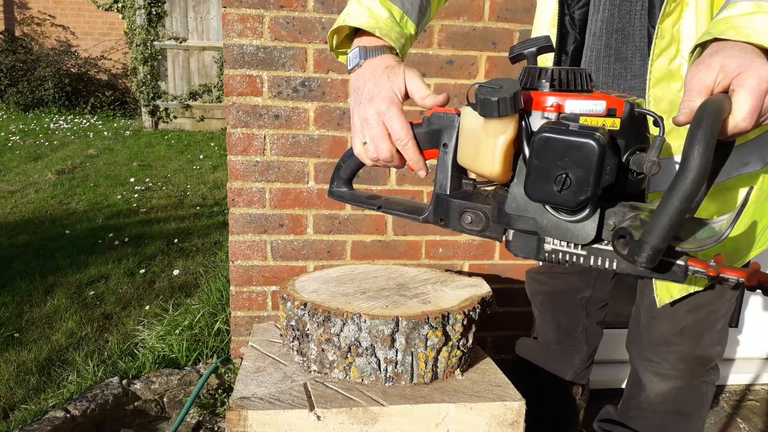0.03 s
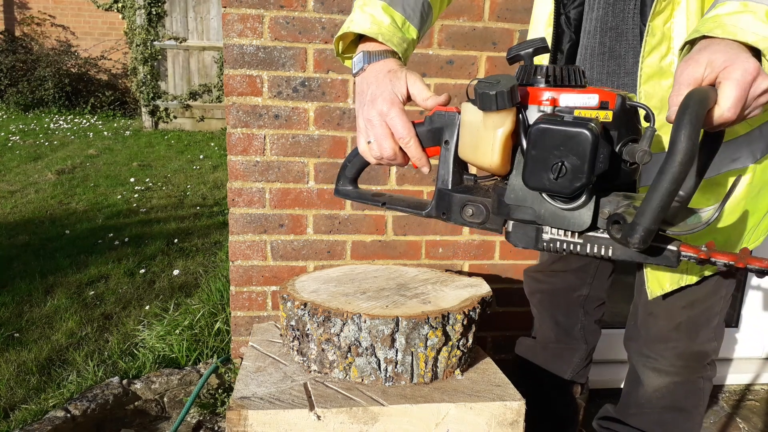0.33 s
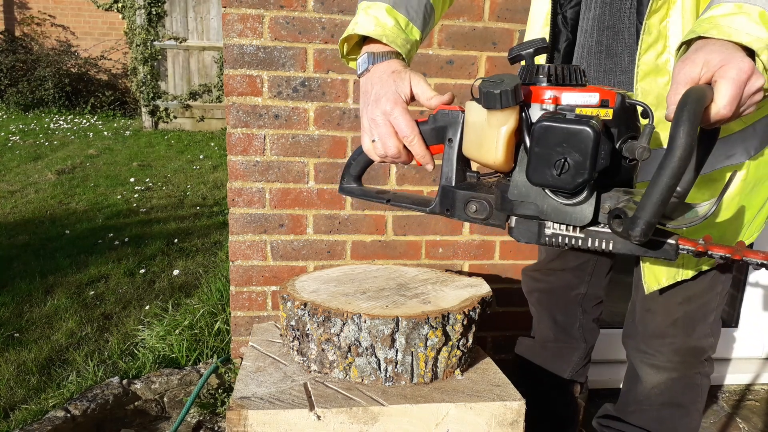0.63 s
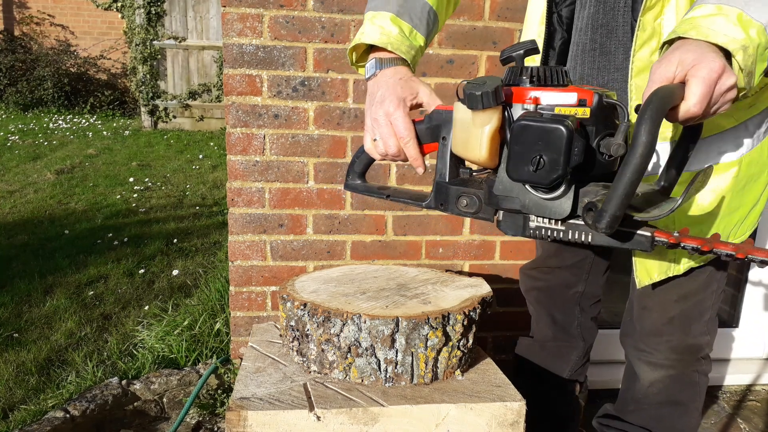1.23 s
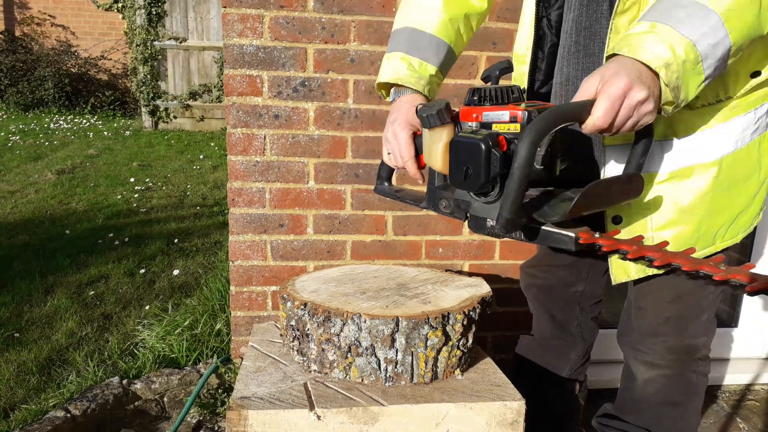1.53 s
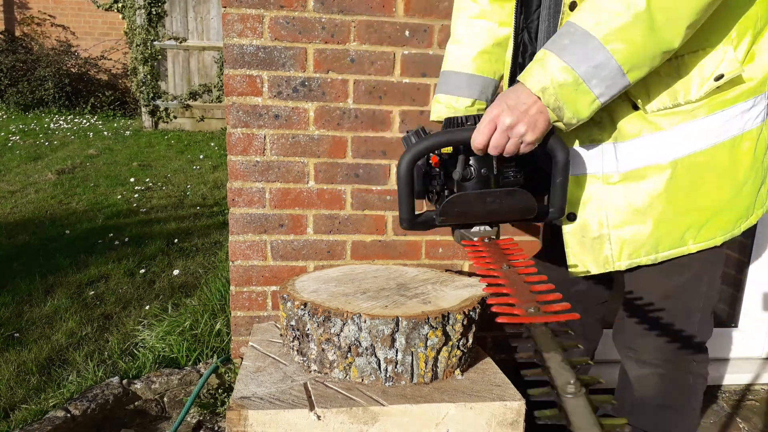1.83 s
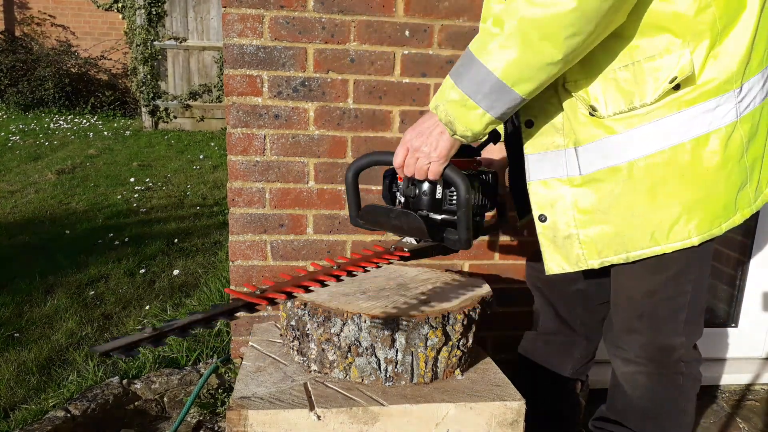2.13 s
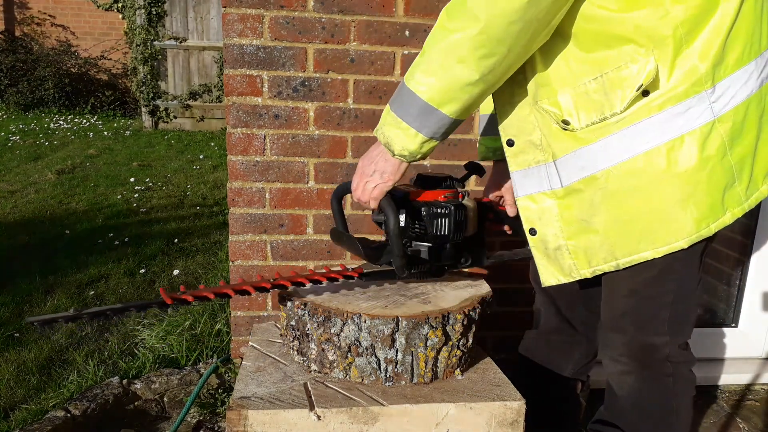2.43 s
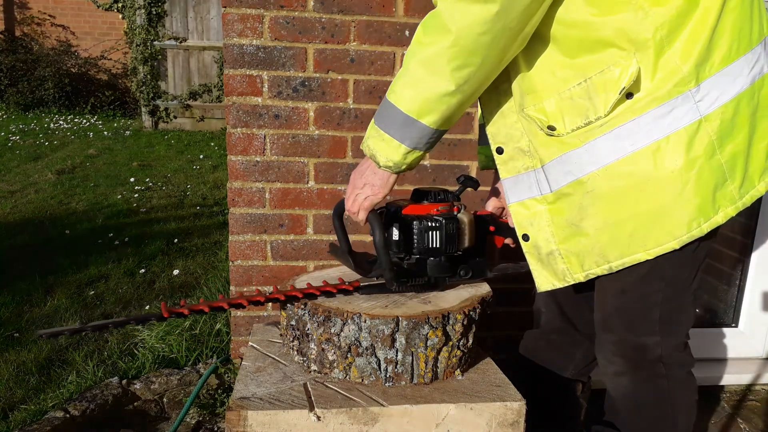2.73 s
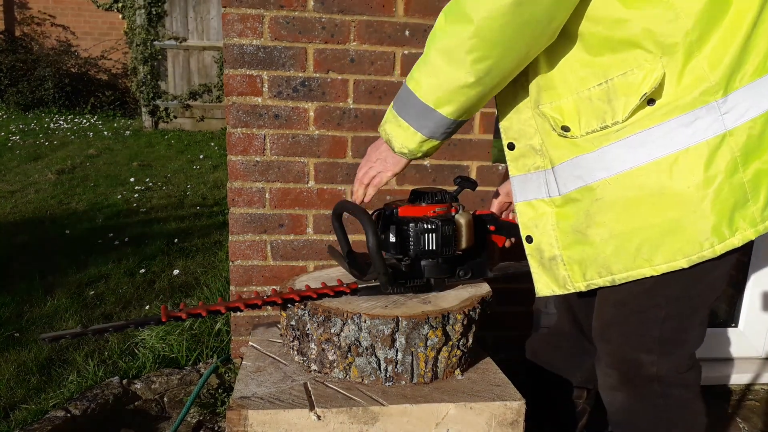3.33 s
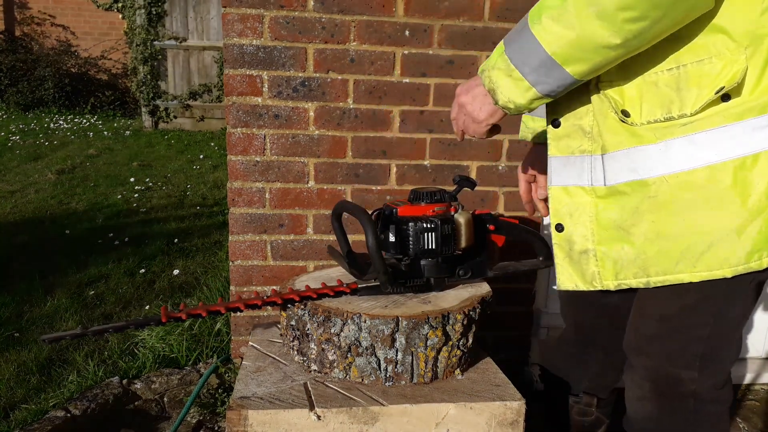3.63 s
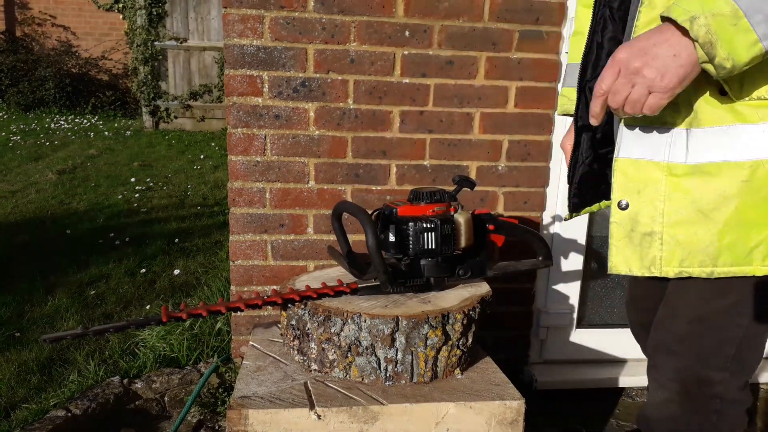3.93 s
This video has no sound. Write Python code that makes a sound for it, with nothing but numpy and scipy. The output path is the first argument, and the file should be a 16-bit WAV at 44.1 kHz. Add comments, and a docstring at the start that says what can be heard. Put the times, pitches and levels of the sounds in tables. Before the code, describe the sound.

A two-stroke hedge trimmer engine idles and cuts out, followed by a wooden knock and rustling.

```python
"""A two-stroke hedge trimmer idles beside a brick wall, blades clashing now and then; it is switched off
and runs down. Each crank turn gives an exhaust pop, an intake gulp, two slaps of the works and a squeak.
The crank rocks to rest with a few clinks, the housing knocks and the tool is set on a log.
A stiff jacket rustles and a blade scrapes briefly over the low wash of a quiet garden."""
import sys
import numpy as np
from scipy import signal
from scipy.fft import rfft, irfft
from scipy.io import wavfile

SR = 44100
rng = np.random.default_rng(int(sys.argv[2]) if len(sys.argv) > 2 else 0)


def dump_mix(stems):
    """Bounce the given channels to the path in sys.argv[1] as a 16-bit WAV at rate SR."""
    frames = np.atleast_2d(stems).T  # one column per channel
    limited = np.clip(frames, -1, 1)  # hard clip at full scale
    pcm = np.round(limited * 32767).astype(np.int16)
    wavfile.write(sys.argv[1], SR, pcm)


N = 176400
T = np.arange(N) / SR
LN_1000 = np.log(1000)  # time constants per t60
CONTACT_GRAIN = .22


def amp(db):
    """Decibels to gain."""
    return 10 ** (np.asarray(db) / 20)


def curve(rows, column=1):
    """Table column, linearly interpolated in time."""
    rows = np.array(rows)
    return np.interp(T, rows[:, 0], rows[:, column])


def unit_rms(x):
    """Scale to rms 1."""
    return x / np.std(x)


def convolve(x, response):
    """Convolution, cut to N samples."""
    return signal.fftconvolve(x, response)[:N]


def excite(x, response):
    """Convolution with a response scaled to unit energy."""
    return convolve(x, response / np.linalg.norm(response))


def butter(x, order, hz, kind="low"):
    """Butterworth filter."""
    return signal.sosfilt(signal.butter(order, hz, kind, fs=SR, output="sos"), x)


def small_part(x):
    """Small parts radiate no deep bass."""
    return butter(x, 4, hz=95, kind="high")


def body(spectrum, size=4096):
    """Minimum-phase response from rows of f/Hz, level/dB."""
    hz, db = np.array(spectrum).T
    bins_hz = np.fft.rfftfreq(size, 1 / SR) + 1
    log_gain = np.interp(np.log(bins_hz), np.log(hz), np.log(amp(db)))
    cepstrum = irfft(log_gain)
    cepstrum[1:size // 2] *= 2
    cepstrum[size // 2 + 1:] = 0
    return irfft(np.exp(rfft(cepstrum)))


def colour(x, spectrum):
    """Shape a white signal, keeping its power."""
    return excite(x, body(spectrum))


def modes(rows, size=16384):
    """Damped sines from rows of f/Hz, level/dB, t60/s."""
    t = T[:size]
    return sum(amp(db) * np.sin(2 * np.pi * hz * t) * np.exp(-LN_1000 * t / t60) for hz, db, t60 in rows)


def ring(x, rows, ring_db):
    """Signal plus the modes it excites."""
    return x + amp(ring_db) * excite(x, modes(rows))


def grit(grain, size=12):
    """Noise of tiny contacts of uneven strength."""
    strength = np.repeat(rng.standard_normal(N // size + 1), size)[:N]
    return unit_rms(rng.standard_normal(N) * np.exp(grain * strength))


def wander(hz):
    """Slow random drift, rms 1."""
    return unit_rms(butter(rng.standard_normal(N), 2, hz))


def burst(start_s, attack_s, hold_s, decay_s):
    """Envelope: linear rise, exponential fall from hold_s after the start."""
    age = T - start_s
    return np.clip(age / attack_s, 0, 1) * np.exp(-np.clip((age - hold_s) / decay_s, 0, 20))


def strokes(turns, at_turn, scatter_db):
    """One impulse per turn at a given crank position."""
    hits = np.diff(np.floor(turns - at_turn), prepend=np.floor(turns[0] - at_turn))
    return hits * amp(scatter_db * rng.standard_normal(N))


def duct(x, hz, stages=1):
    """All-pass: a duct lets the highs out before the lows."""
    pole = np.exp(-2 * np.pi * hz / SR)
    for _ in range(stages):
        x = signal.lfilter([-pole, 1], [1, -pole], x)
    return x


BACKGROUND_LEVEL = [(1.5, -60), (1.9, -59.5), (2.2, -54.5), (2.7, -54), (3.1, -51.5), (4, -50.5)]  # rises as the recorder's gain recovers after the engine: t/s, level/dB
AIR_SPECTRUM = [(25, 9), (55, 5.5), (100, 7.5), (160, -2), (210, 6.5), (330, -1.5), (480, 5), (680, 1),
                (1000, 5.5), (1400, -5), (1900, -7), (2800, -22.5), (6000, -28), (15000, -47)]  # f/Hz, level/dB
FAR_WHINE = [(3.0, 550, -90), (3.45, 511, -58), (3.6, 495, -52.5), (3.85, 461, -61.5)]  # t/s, f/Hz, level/dB
def background():
    """Low wash of distant traffic and air, with a faint falling whine."""
    phase = 2 * np.pi * np.cumsum(curve(FAR_WHINE)) / SR
    fade_in = np.clip((T - FAR_WHINE[0][0]) * 10, 0, 1)
    whine = wander(hz=7.8) * np.sin(phase) * amp(curve(FAR_WHINE, 2)) * fade_in
    wash = colour(rng.standard_normal(N), AIR_SPECTRUM) * amp(curve(BACKGROUND_LEVEL) + 1.5)
    return wash + whine


RUSTLE_LEVEL = [(1.5, -68), (2.1, -58), (2.35, -54), (2.65, -56), (2.82, -59), (3.05, -54), (3.17, -70),
                (3.27, -66), (3.42, -48), (3.66, -46), (3.8, -50.5), (4, -52)]  # t/s, level/dB
CLOTH_SPECTRUM = [(500, -23.5), (1500, 1), (2700, -1), (3900, 4), (6000, -3.5), (9500, -2.5), (13000, -6.5),
                  (16000, -11)]  # f/Hz, level/dB
def jacket():
    """Stiff cloth rustles unevenly with the arms."""
    rustle = grit(grain=.15) * amp(curve(RUSTLE_LEVEL) - 3.5 + 1.6 * wander(hz=27))
    return colour(rustle, CLOTH_SPECTRUM)


SWISHES_AND_SCRAPES = [(1.76, 0.17, -73, 3900, .08, .1), (2.463, 0.026, -56.5, 10170, 0.023, .1),
                       (2.464, .03, -53.5, 3960, 0.054, .5), (2.606, 0.038, -64, 14000, .25, .1),
                       (3.841, .012, -37, 6330, .5, 0.74), (3.862, 0.051, -38, 5130, 0.6, 1),
                       (3.909, 0.031, -39, 3906, 0.43, .88)]  # t/s, hold/s, level/dB, f/Hz, sigma/octaves, hiss share
def swishes_and_scrapes():
    """Sleeve swishes and one brief, thin scrape of a sliding blade."""
    out = np.zeros(N)
    bins_hz = np.fft.rfftfreq(N, 1 / SR) + 1
    hiss = bins_hz / (bins_hz + 300) * np.exp(-bins_hz / 9000)
    for t, hold_s, db, hz, octaves, share in SWISHES_AND_SCRAPES:
        band = np.exp(-.5 * (np.log2(bins_hz / hz) / octaves) ** 2)
        rub = irfft(rfft(grit(grain=.15)) * (band + share * hiss), N)
        out += amp(db) * burst(t, .01, hold_s, .0069) * unit_rms(rub)
    return out


HOUSING_KNOCKS = [(1.256, -35.5, 135, 0.11), (1.342, -40.5, 157, 0.11), (1.881, -40.5, 104, 0.097),
                  (2.078, -43, 90, 0.039), (2.217, -37.5, 55.5, 0.13), (2.857, -44, 167, 0.026)]  # t/s, level/dB, f/Hz, t60/s
FASTENER_TICKS = [(2.869, -52), (2.907, -44), (2.921, -44)]  # t/s, level/dB
TICK_SPECTRUM = [(500, -22), (3500, -3.5), (6000, 2.5), (10500, -0.5), (15000, -15)]  # f/Hz, level/dB
def housing():
    """The handled housing knocks dully; plastic and fasteners tick."""
    knocks = sum(amp(db) * burst(t, .0015, .0056, t60 / LN_1000) * np.sin(2 * np.pi * hz * (T - t))
                 for t, db, hz, t60 in HOUSING_KNOCKS)
    ticks = sum(amp(db) * burst(t, .00066, .00066, .0051) for t, db in FASTENER_TICKS)
    return knocks + colour(ticks * grit(CONTACT_GRAIN), TICK_SPECTRUM)


LANDING_BLOWS = [(2.757, -25.5), (2.7654, -22), (2.78, -38)]  # t/s, level/dB
LOG_MODES = [(155.6, -16.5, 0.27), (194, -5.5, 0.089), (288, -8.5, 0.086), (384, -17, 0.14),
             (844, -16.5, 0.034), (1369, -21, 0.098)]  # log and housing: f/Hz, level/dB, t60/s
CRACK_SPECTRUM = [(200, 1), (1500, -7), (2500, -12.5), (7000, -23), (15000, -44)]  # f/Hz, level/dB
def landing():
    """The tool meets the log: each blow cracks and rings both."""
    blows = np.zeros(N)
    for t, db in LANDING_BLOWS:
        blows[int(t * SR)] += amp(db)
    contact = convolve(blows, burst(0, .00071, .002, .011)) * grit(CONTACT_GRAIN)
    return convolve(blows, modes(LOG_MODES)) + amp(-21) * colour(contact, CRACK_SPECTRUM)


DRIVE_CLINKS = [(1.027, -34, 5250), (1.067, -26, 6800), (1.122, -27.5, 5650), (1.155, -36, 6000),
                (1.174, -39, 6140), (1.181, -33, 6070), (1.249, -42.5, 5750), (1.271, -43, 6920),
                (1.337, -43.5, 5430), (1.371, -48.5, 5870), (1.451, -45.5, 5300)]  # t/s, level/dB, ring f/Hz
CLINK_SPECTRUM = [(300, 11.5), (1300, 2), (2200, 6.5), (3000, 1.5), (4200, 3), (7000, -4), (9500, -4),
                  (13000, -15), (16000, -30)]  # f/Hz, level/dB
def clinks():
    """Sharp knocks of the works as the engine runs down, then as the crank stalls and rocks back; each knock
    rings another loose part."""
    force, rings = np.zeros(N), np.zeros(N)
    for t, db, hz in DRIVE_CLINKS:
        tail = amp(-19.5) * burst(t, .004, 0, .053)
        force += amp(db) * (burst(t, .0011, .0022, .0051) + tail)
        rings += burst(t, .002, 0, .13 / LN_1000) * np.sin(2 * np.pi * hz * (T - t))
    return small_part(colour(force * grit(CONTACT_GRAIN), CLINK_SPECTRUM)) + amp(-53) * rings


BLADE_MODES = [(3330, -3.5, 0.15), (3930, 5, 0.033), (4860, -12.5, 0.047), (6770, 11, 0.042),
               (8200, -11, 0.045), (8910, 1.5, 0.18), (9960, 8, 0.088)]  # f/Hz, level/dB, t60/s
BLADE_CLASHES = [(0.031, -33), (0.077, -21), (0.121, -21.5), (0.228, -33), (0.366, -21.5), (0.411, -23),
                 (0.456, -24), (0.547, -30), (0.576, -21.5), (0.622, -22), (0.68, -16.5), (0.741, -18)]  # t/s, level/dB
CLASH_SPECTRUM = [(300, 1.5), (450, 6.5), (700, -2), (2000, -10), (3500, -6), (7000, -7), (10000, -5),
                  (11500, -14.5), (14000, -11), (16000, -30)]  # f/Hz, level/dB
def blades(detune=.006):
    """The clutch snatches and the steel blades clash, ringing a little differently wherever they meet."""
    contact = grit(CONTACT_GRAIN)
    out = np.zeros(N)
    for t, db in BLADE_CLASHES:
        steel = [(hz * (1 + detune * rng.standard_normal()), mode_db, t60)
                 for hz, mode_db, t60 in BLADE_MODES]
        clash = amp(db) * burst(t, .0052, .011, .0054) * contact
        out += ring(clash, steel, ring_db=-12.5)
    return small_part(colour(out, CLASH_SPECTRUM))


SQUEAK_MODES = [(12050, 3, 0.008), (14250, -2, 0.007)]  # f/Hz, level/dB, t60/s
def squeak(turns, speed_hz, at_turn=.12, focus=4.4, stall_hz=10):
    """Metal rubs once a turn, equally strong at any speed above the stall."""
    rub = np.exp(focus * (np.cos(2 * np.pi * (turns - at_turn)) - 1)) * (speed_hz > stall_hz)
    return amp(-39.5) * excite(rub * rng.standard_normal(N), modes(SQUEAK_MODES))


SHIELD_MODES = [(4965, -43, .11)]  # f/Hz, level/dB, t60/s
def shield(turns):
    """The muffler's tin shield rings at each pop."""
    return convolve(strokes(turns, at_turn=0, scatter_db=2.2), modes(SHIELD_MODES))


CLATTER_SPECTRUM = [(200, 3), (400, 5), (800, 1), (1200, 1), (2000, -3), (2800, -6), (5000, -4.5),
                    (7500, -12), (9500, -15), (11000, -18), (15500, -25.5)]  # f/Hz, level/dB
def clatter(turns, gain, bed=.48):
    """Piston and gears slap twice a turn over a steady rattle and ring the blades."""
    slaps = .96 * strokes(turns, at_turn=.077, scatter_db=2.2)
    slaps += 1.18 * strokes(turns, at_turn=.56, scatter_db=2.2)
    force = (bed + convolve(slaps, burst(0, .00094, .00068, .0045))) * gain
    rattle = colour(force * grit(grain=.1), CLATTER_SPECTRUM)
    return small_part(ring(rattle, BLADE_MODES, ring_db=-14.5))


INTAKE_SPECTRUM = [(90, -4.5), (135, -3), (200, 2), (460, 1.5), (620, -4), (1000, -18), (3000, -61)]  # f/Hz, level/dB
AIRBOX_MODES = [(228, -2.2, .06), (265, 0, 0.046), (439, 2.1, 0.072)]  # f/Hz, level/dB, t60/s
def intake(turns, gain):
    """One falling gulp of air per turn rings the hollow air box."""
    gulps = convolve(strokes(turns, at_turn=.46, scatter_db=1) * gain, body(INTAKE_SPECTRUM))
    hollow = ring(gulps, AIRBOX_MODES, ring_db=-28)
    return small_part(duct(hollow, hz=330, stages=2))


MUFFLER_SPECTRUM = [(50, -20.5), (120, -13.5), (270, 0.5), (420, -18), (650, -4.5), (790, -1.5), (860, -7),
                    (1000, 2.5), (1300, 2), (1480, -12.5), (1900, -2), (2500, -15.5), (4000, -26.5),
                    (12000, -61.5)]  # f/Hz, level/dB
def exhaust(turns, gain):
    """One pop per turn leaves through port and muffler."""
    pulses = strokes(turns, at_turn=0, scatter_db=.7) * gain
    return duct(convolve(pulses, body(MUFFLER_SPECTRUM)), hz=600)


def echoes(x, wall_delay_s=.00591, yard_t60_s=.1):
    """A dull reflection from the brick wall and a short diffuse tail from the yard."""
    wall = butter(np.interp(T - wall_delay_s, T, x, left=0), 2, hz=836)
    tail = rng.standard_normal(N) * burst(.00084, .0043, 0, yard_t60_s / LN_1000)
    return amp(-7) * wall + amp(-12.5) * excite(x, tail)


CRANK_SPEED = [(0, 65.17), (.25, 65.03), (.33, 66.43), (.44, 65.92), (.57, 66.82), (.66, 66.64),
               (.76, 67.39), (.88, 50.33), (1, 33.23), (1.09, 18.24), (1.17, 9), (1.21, 0)]  # t/s, rotation f/Hz
ENGINE_LEVELS = [(0, -7.5, -10, -33.5), (.2, -3, -5, -31.5), (.45, -1.5, -4.5, -29.5),
                 (.7, -0.5, -3, -27.5), (.82, -1, 2.5, -31.5), (.95, -3, 1, -29), (1.05, -7, 0.5, -29),
                 (1.12, -10, -5.5, -31), (1.185, -24, -12, -43.5), (1.21, -30, -19, -48.5),
                 (1.5, -40.5, -27, -55.5)]  # t/s, exhaust level/dB, intake level/dB, clatter level/dB
def engine(first_pop_turns=.455, wobble_turns=.005):
    """The two-stroke idles and runs down; its crank times every part, and pops and gulps echo."""
    speed_hz = curve(CRANK_SPEED)
    wobble = wobble_turns * wander(hz=30) * np.clip(speed_hz / speed_hz[0], 0, 1)
    turns = np.cumsum(speed_hz) / SR - first_pop_turns + wobble
    pops = exhaust(turns, gain=amp(17 + curve(ENGINE_LEVELS, 1)))
    gulps = intake(turns, gain=amp(14.5 + curve(ENGINE_LEVELS, 2)))
    reflected = echoes(pops + gulps)
    works = clatter(turns, gain=amp(curve(ENGINE_LEVELS, 3)) * (T < ENGINE_LEVELS[-1][0]))
    return pops + gulps + reflected + works + squeak(turns, speed_hz) + shield(turns)


def scene():
    """All sources, mono."""
    trimmer = engine() + blades() + clinks() + landing() + housing()
    return (trimmer + jacket() + swishes_and_scrapes() + background())[None]


def record(dry, top_hz=15650):
    """Thin the deep bass and cut the top."""
    thin = butter(dry, 3, hz=45, kind="high")
    return signal.sosfilt(signal.ellip(10, .2, 80, top_hz, fs=SR, output="sos"), thin)


dry = scene()
out = record(dry)
dump_mix(out)
```